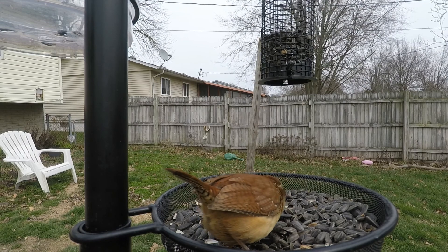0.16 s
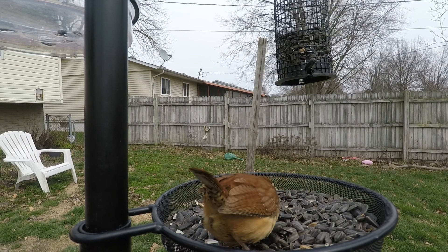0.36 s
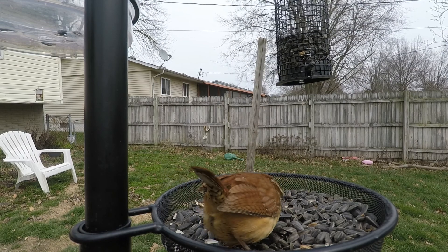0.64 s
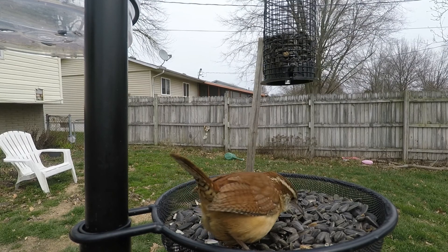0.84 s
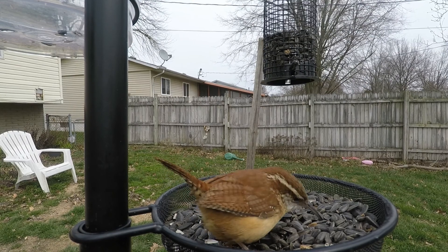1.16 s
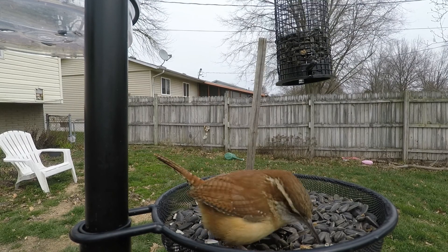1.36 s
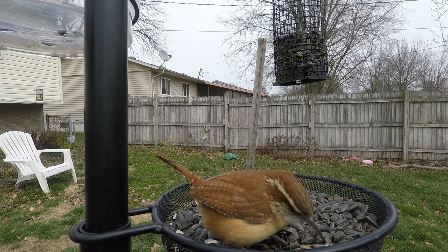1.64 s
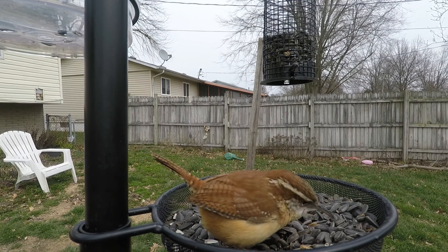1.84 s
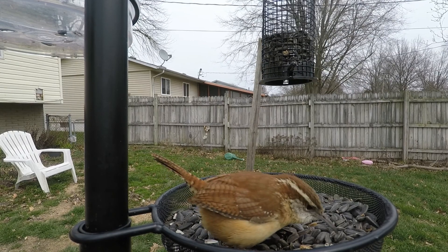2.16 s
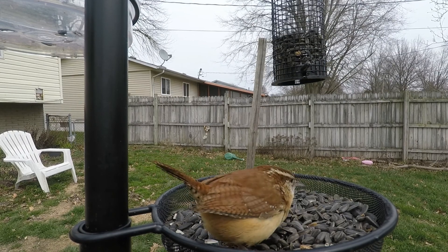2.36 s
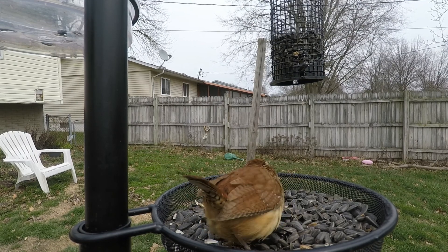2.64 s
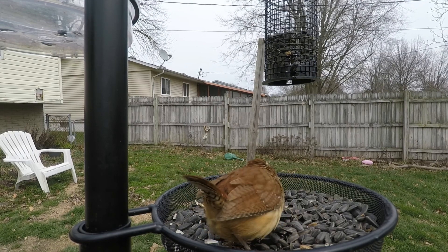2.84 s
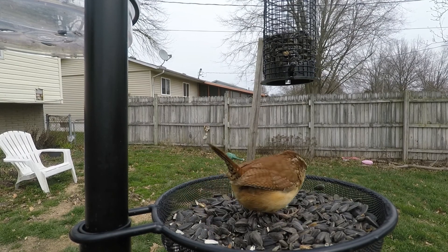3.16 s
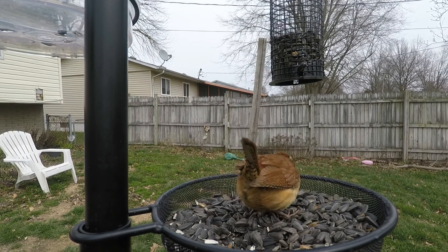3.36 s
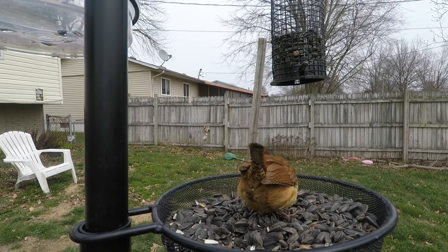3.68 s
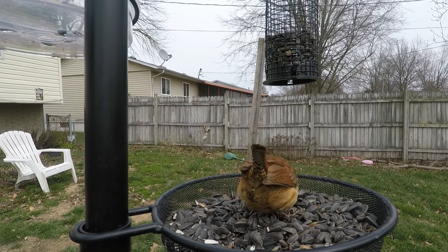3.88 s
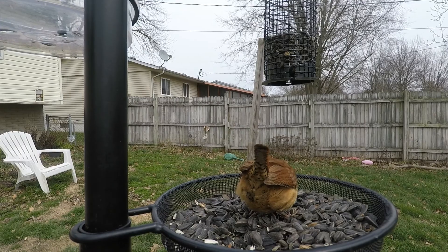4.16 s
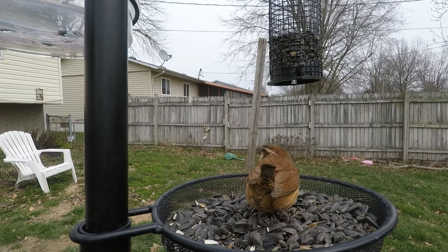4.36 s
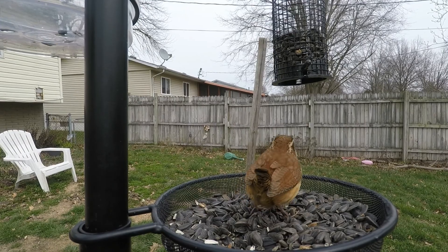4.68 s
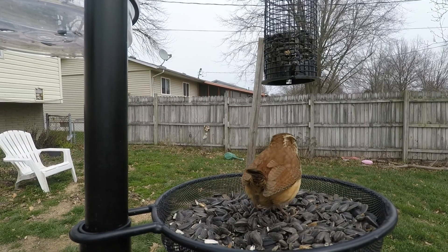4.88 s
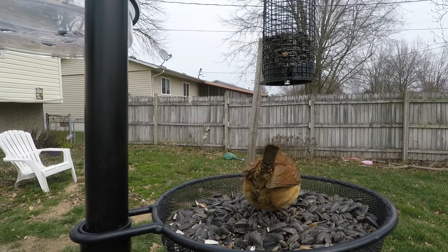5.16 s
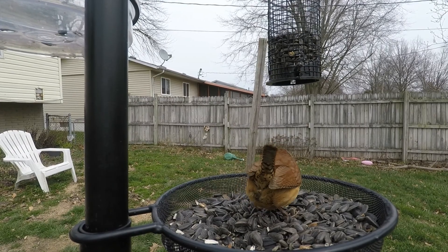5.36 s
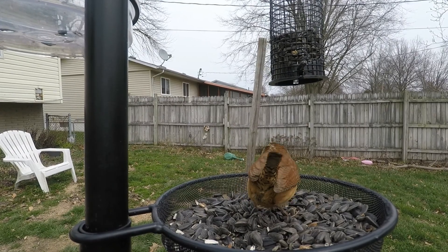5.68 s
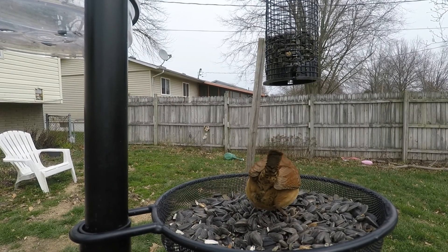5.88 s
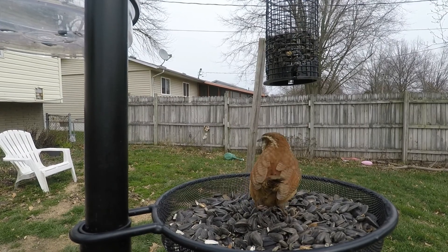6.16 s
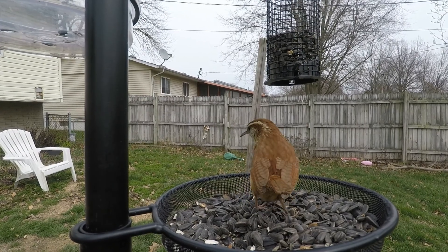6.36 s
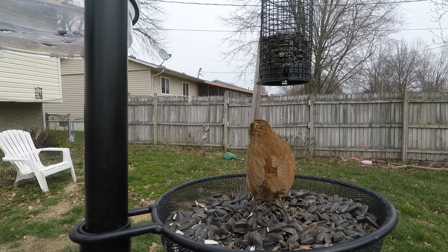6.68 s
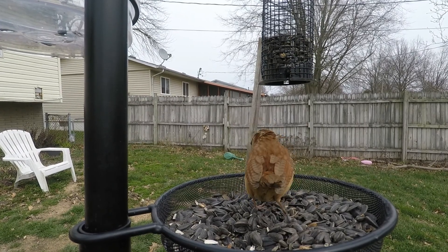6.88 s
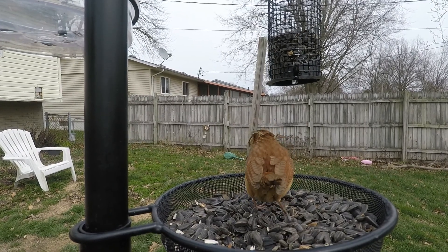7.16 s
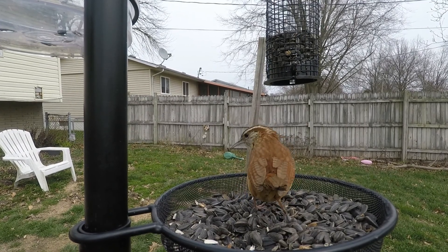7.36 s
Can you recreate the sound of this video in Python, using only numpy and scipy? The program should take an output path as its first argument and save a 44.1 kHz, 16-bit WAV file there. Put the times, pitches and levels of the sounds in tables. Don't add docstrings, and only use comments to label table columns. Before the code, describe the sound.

Outdoors in a yard, low wind buffets the microphone and far birds chirp and chatter with faint echoes. Around three seconds a crisp peck and hop sound on a metal tray of seeds; from four seconds come loud, boomy knocks, rattling seeds and small scrapes, in irregular clusters to the end, felt through the pole holding the microphone.

```python
import sys
import numpy as np
from scipy import signal
from scipy.fft import rfft, irfft, next_fast_len
from scipy.io import wavfile
from scipy.ndimage import uniform_filter1d, minimum_filter1d, map_coordinates

SR = 44100
rng = np.random.default_rng(int(sys.argv[2]) if len(sys.argv) > 2 else 0)


def voltage_ratio(decibels):
    exponent = np.asarray(decibels, float) / 20
    return 10 ** exponent


def materialize(psi):
    bounded = np.clip(np.atleast_2d(psi).T, -1, 1)
    quanta = np.round(bounded * 32767).astype(np.int16)
    wavfile.write(sys.argv[1], SR, quanta)


N = 332073


def evened(x):
    return x / np.sqrt(np.mean(x ** 2) + 1e-20)


def curve(rows, column=1):
    rows = np.array(rows)
    return np.interp(np.arange(N) / SR, rows[:, 0], rows[:, column])


def add(mix, s, sound):
    part = mix[..., round(s * SR):][..., :sound.shape[-1]]
    part += sound[..., :part.shape[-1]]


def resonate(x, hz, width, count=1):
    turn = np.exp(2j * np.pi * np.cumsum(hz * np.ones(len(x))) / SR)
    r = np.exp(-np.pi * width / SR)
    low = x / turn + 1e-18
    for _ in range(count):
        low = signal.lfilter([1 - r], [1, -r], low)
    return 2 * (turn * low).real


def drift(per_s):
    knots = rng.standard_normal(2000)
    return map_coordinates(knots, [np.arange(N) * per_s / SR], order=3)


def coloured(spectrum, share):
    hz = np.fft.rfftfreq(N, 1 / SR)
    f, db = np.transpose(spectrum)
    shape = voltage_ratio(np.interp(np.log(hz + 1), np.log(f + 1), db)) * share(hz)
    return irfft(rfft(rng.standard_normal(N)) * shape, N)


# t/s, level/dB
GUSTS = [(0.0, -32), (0.12, -15.5), (0.36, -25.5), (0.52, -19), (1.34, -20.5), (1.4, -27), (1.84, -24.5),
         (1.91, -30), (2.1, -17), (2.95, -23.5), (3.0, -18.5), (4.32, -32.5), (6.44, -32), (6.73, -19.5),
         (7.05, -38), (7.17, -20), (7.53, -33.5)]
# t/s, level/dB
HISS = [(0.0, -71.5), (0.38, -70), (3.98, -70), (4.1, -75), (4.32, -82.5), (4.745, -82), (4.755, -97),
        (4.79, -97), (4.8, -82), (5.64, -81.5), (6.1, -79.5), (6.75, -74), (6.9, -75.5), (7.09, -78),
        (7.53, -76.5)]
# f/Hz, level/dB per Hz
AIR_MID = [(8.8, -29), (15, 4), (33, -0.5), (55, -3.5), (87, -8.5), (174, -22.5), (293, -30.5), (552, -45),
           (1010, -47.5), (1240, -51), (1700, -54), (4950, -62), (7200, -59), (14800, -71)]
# f/Hz, level/dB per Hz
AIR_SIDE = [(8.8, -23), (15, 13), (60, 16), (138, -21), (174, -17.5), (239, -28.5), (369, -16),
            (638, -18.5), (1070, -24.5), (1170, -29), (1310, -29.5), (4670, -46), (7620, -39.5),
            (14800, -53)]


def air():
    def low(hz):
        return 1 / (1 + (hz / 130) ** 4)

    def high(hz):
        return np.sqrt(1 - low(hz) ** 2)

    wind = evened(coloured(AIR_MID, low))
    lumps = np.sqrt(abs(uniform_filter1d(wind ** 2, 5000)) + 0.016)
    wind *= voltage_ratio(curve(GUSTS) + .5) / lumps ** .7
    eddies = evened(coloured(AIR_SIDE, low)) * voltage_ratio(0.43 * curve(GUSTS) - 25.5)
    gain = voltage_ratio(curve(HISS) + 72 + 1.22 * drift(9.9))
    mid = evened(coloured(AIR_MID, high)) * voltage_ratio(-35) * gain
    side = evened(coloured(AIR_SIDE, high)) * voltage_ratio(-40.5) * gain
    wind_balance = voltage_ratio(np.array([[-1.6], [1.4]]))
    return wind * wind_balance + mid + (eddies + side) * np.array([[1], [-1]])


# t/s, level/dB
SWAY = [(0, -49), (.45, -21.5), (1.0, -31), (1.75, -38), (2.0, -26.5), (2.85, -34), (3.2, -23.5),
        (3.8, -31), (4.12, -15.5), (4.4, -11), (4.5, -19.5), (4.75, -11), (5.6, -19), (6.3, -12),
        (6.7, -18.5), (7.0, -12), (7.12, -23), (7.53, -17.5)]


def sway():
    turns = np.cumsum(56 + 3.62 * drift(14)) / SR
    bend = np.sqrt(2) * voltage_ratio(1.5 * drift(21)) * np.sin(2 * np.pi * turns)
    flutter = voltage_ratio(-11.0) * evened(resonate(rng.standard_normal(N), 69.6, 14, count=2))
    return voltage_ratio(curve(SWAY)) * (bend + flutter)


# f/Hz, left phase lead/rad, left-right level/dB
PORTS = [(56, 2.5, 0), (200, 2.7, -4.5), (330, 2.8, -2), (420, 1.8, 1), (510, 2.45, 0), (660, 2.85, 0),
         (900, 2.45, 2), (1300, 2.05, -1), (1480, 2.85, 0), (1900, 3.42, 1), (2350, 4.4, 2), (3300, 6.2, 0)]


def ports(x):
    size = next_fast_len(N + SR)
    x = np.pad(x, (0, size - N), "reflect", reflect_type="odd")
    x = x * np.r_[np.ones(N), np.hanning(2 * (size - N))[size - N:]]
    hz = np.fft.rfftfreq(size, 1 / SR)
    f, lead, db = np.transpose(PORTS)
    lead, db = (np.interp(np.log(hz + 1), np.log(f), v) for v in (lead, db))
    left, right = voltage_ratio(db / 2), voltage_ratio(-db / 2) * np.exp(-1j * lead)
    return irfft(rfft(x) * np.array([left, right]), size)[:, :N]


# its shape (t/s, f/Hz, level/dB); hoarseness 0-1; left-right level/dB;
# and its utterances (t/s, level/dB, pitch factor).
HOOK = ([(0, 3100, -14), (.011, 3550, -8), (.017, 4550, 0), (.026, 4650, 0), (.041, 4300, 0),
        (.057, 4050, 0), (.068, 3500, -6)], .2, 1.2, [(.839, -33.5, .985), (2.155, -34, 1.01),
        (3.07, -39, 1.01), (5.47, -50, 1.01), (6.642, -45, 1.01)])
LISP = ([(0, 6500, 0), (.045, 5700, 0)], .9, 3, [(.815, -52, 1), (2.13, -49, 1), (3.045, -52, 1),
        (6.62, -58, 1)])
FLICK = ([(0, 2950, -4), (.022, 3550, 0), (.034, 3300, -4)], .3, 3, [(2.345, -54, 1), (2.44, -52, .95),
         (.947, -43, .98), (.795, -47, 1), (.4, -51, 1), (2.266, -44, 1), (5.582, -54, 1), (6.75, -53, 1),
         (1.45, -61, .9), (2.75, -54, 1.13), (3.865, -56, .96), (5.412, -60, 1.18), (6.795, -57, 1.22),
         (1.96, -64, 1.2)])
SPARK = ([(0, 5600, -4), (.018, 5500, 0), (.028, 6100, 0), (.046, 7200, -6)], .6, 3, [(.378, -51, 1.5),
         (.928, -49, 1), (2.244, -46, 1), (5.56, -54, 1), (6.732, -56, 1)])
LEAD = ([(0, 4500, -8), (.018, 5150, 0), (.045, 5650, -3)], .3, -2, [(.682, -54, 1), (2.748, -53, 1),
        (4.605, -59, 1), (5.745, -66, 1), (.105, -62, .92)])
ARCH = ([(0, 2550, -24), (.025, 2880, -16), (.07, 3370, -1), (.087, 3520, 0), (.105, 3250, -3),
        (.135, 2750, -5)], .25, -2, [(.687, -39, 1), (2.76, -42, .965), (4.61, -50, 1), (5.74, -61, .92),
        (.733, -51, 1), (2.806, -50, .965), (2.86, -60, .95), (4.655, -63, .98), (5.79, -67, .92)])
SWEEP = ([(0, 1850, -8), (.045, 2250, -4), (.065, 3150, 0), (.085, 3650, -3)], .3, 1.5, [(1.78, -56, 1),
         (2.678, -53, 1), (2.955, -54, 1), (3.242, -56, 1), (3.535, -53, 1), (3.285, -63, .95),
         (3.59, -63, .95), (2.39, -56, .9), (2.095, -60, 1), (1.4, -66, .9), (3.01, -59, 1)])
PEAK = ([(0, 2500, -8), (.008, 3600, 0), (.018, 4550, 0), (.031, 3900, 0), (.041, 2900, 0),
        (.06, 2350, -4)], .35, 1.5, [(1.17, -63, 1), (1.268, -61, .89), (2.366, -48, 1.03), (2.41, -56, .9),
        (3.794, -49, 1), (6.37, -59, 1), (6.82, -50, 1), (4.205, -63, .92)])
FALL = ([(0, 5300, 0), (.015, 5050, 0), (.035, 5400, 0), (.095, 2900, -4)], .2, -1.5, [(2.64, -51, 1),
        (3.42, -65, 1.13)])
DROP = ([(0, 4600, 0), (.025, 3900, 0), (.042, 3000, -3)], .3, -1.5, [(.082, -57, .96)])
RIDGE = ([(0, 2950, -18), (.05, 3250, -12), (.061, 4700, 2), (.076, 4800, 2), (.083, 4050, -4),
         (.095, 3950, -4), (.105, 2950, -8), (.148, 2950, -12), (.168, 3700, -4)],
         .55, 1.5, [(.25, -45.5, 1), (4.058, -53, 1)])
CHIP = ([(0, 6000, 0), (.03, 6350, 0)], .3, -3, [(.14, -52, 1), (.172, -51, 1), (.265, -49, 1),
        (.31, -50, 1), (.385, -46, 1), (.43, -46, 1), (3.73, -48, .96), (4.07, -54, 1), (4.19, -50, 1),
        (4.235, -54, 1), (.305, -56, 1.55), (.39, -58, 1.5), (.13, -62, 1.39)])
DIP = ([(0, 6200, 0), (.025, 5700, -3), (.045, 6000, -3)], .2, -3, [(.35, -44, 1), (4.158, -50, 1),
       (.32, -50, .93)])
SEEP = ([(0, 6500, 0), (.08, 6750, 0), (.14, 6900, -5)], .2, -3, [(.17, -57, 1.02), (4.39, -62, 1)])
CLIMB = ([(0, 3500, 0), (.018, 4200, -3), (.034, 5500, 0)], .4, 1.5, [(3.768, -53, 1)])
CALLS = (HOOK, LISP, FLICK, SPARK, LEAD, ARCH, SWEEP, PEAK, FALL, DROP, RIDGE, CHIP, DIP, SEEP, CLIMB)


def birds():
    out = np.zeros((2, N))
    for shape, hoarse, pan_db, calls in CALLS:
        times, *columns = np.transpose(shape)
        t = np.arange(0, times[-1], 1 / SR)
        hz, swell_db = (uniform_filter1d(np.interp(t, times, c), size=200) for c in columns)
        balance_db = np.array([[pan_db], [-pan_db]]) / 2

        def chance(size):
            return evened(uniform_filter1d(rng.standard_normal(len(hz)), size=size))

        for s, db, key in calls:
            flutter = 1 - hoarse + hoarse * chance(50)
            fade, wobble = chance(350), chance(350)
            flutter *= voltage_ratio(2.8 * fade)
            pitch = key * hz * (1 + .006 * wobble)
            tone = np.sin(2 * np.pi * np.cumsum(pitch) / SR)
            tone *= flutter * signal.windows.tukey(len(hz), .3)
            both = np.array([tone, np.roll(tone, 2)])
            add(out, s, voltage_ratio(db + 7.0 + swell_db + balance_db) * both)
    return out


# delay t/s, level/dB
ECHOES = [
    (.05, -27),
    (.09, -25),
]


def yard(x):
    t = np.arange(SR // 2) / SR
    density, blur_s, t60_s = .05, .014, 0.45
    taps = rng.choice([-1., 1.], (2, len(t))) * (rng.random((2, len(t))) < density)
    walls = sum(voltage_ratio(db) * np.exp(-((t - s) / blur_s) ** 2) for s, db in ECHOES)
    walls = walls / np.sqrt(density * blur_s * SR)
    tail = taps * voltage_ratio(-60 * t / t60_s) * (1 - np.exp(-t / 0.006))
    response = voltage_ratio(-14) * tail / np.linalg.norm(tail[0]) + taps * walls
    return x + signal.fftconvolve(x, response, axes=1)[:, :N]


# t/s, level/dB, place struck (-1 near the pole to 1 at the rim)
KICKS = [(0.298, -28.5, 0.72), (0.417, -33, -1), (.65, -35.5, 0.25), (2.714, -29, 1), (3.138, -20.5, -0.89),
         (3.238, -26.5, -1), (3.346, -37, -1.2), (3.666, -33, 1), (3.969, -27.5, -0.24),
         (4.069, -11.5, 0.98), (4.197, -12.5, -0.02), (4.281, -16.5, 0.79), (4.716, -8.5, 0.92),
         (4.877, -26, 0.57), (4.938, -31, 0.28), (5.049, -29, 0.67), (5.123, -18, -0.76),
         (5.215, -16.5, 0.34), (5.437, -14.5, 0.54), (5.5, -23, -1.2), (5.554, -32, -1.1),
         (5.85, -21.5, -0.12), (5.924, -20, 1), (6.168, -18.5, 1), (6.214, -21, 0.78), (6.56, -22, -1.3),
         (6.646, -29, -0.84), (6.709, -24.5, -0.88), (6.854, -20, 0.15), (6.941, -18.5, 0.47),
         (7.007, -22.5, 0.12), (7.09, -26.5, .9), (7.173, -26, -1.6)]


def rattle():
    stir_db, rattle_db, rise_s, t60_s = -50.5, -19, 0.0065, 0.79
    out, t = np.full(N, voltage_ratio(stir_db)), np.arange(SR) / SR
    for s, db, place in KICKS:
        add(out, s, voltage_ratio(db + rattle_db - 60 * t / t60_s) * (1 - np.exp(-t / rise_s)))
    return out


# f/Hz, decay time t60/s
BRACKET = [(174, 0.29), (206, 0.32), (238, 0.36)]


def bracket():
    place_db = 6
    out, t = np.zeros(N), np.arange(SR // 2) / SR
    swell = 1 - np.exp(-t / 0.0018)
    for (s, db, place), luck in zip(KICKS, rng.random((len(KICKS), 6))):
        for k, (hz, t60) in enumerate(BRACKET):
            shifted_hz = hz * (.975 + 0.065 * luck[k])
            ring = np.sin(2 * np.pi * (shifted_hz * t + luck[k + 3]))
            mode_db = db - place_db * (k - 1 - place) ** 2 + 10.5
            add(out, s, voltage_ratio(mode_db - 60 * t / t60) * swell * ring)
    shaking = rattle() * voltage_ratio(13.0) * rng.standard_normal(N)
    stir = sum(resonate(shaking, hz, 25, count=2) for hz, t60 in BRACKET) * np.sqrt(SR / 100)
    return out * voltage_ratio(2.43 * drift(30)) + stir


# t/s, length/s, f/Hz, width/Hz, level/dB
CHATTER = [(0.3, 0.23, 6200, 1300, -47), (0.31, 0.16, 4600, 2400, -53), (.38, .14, 3200, 900, -56),
           (.3, .15, 12500, 3000, -65), (.305, .03, 9700, 900, -54), (2.33, 0.24, 3500, 1800, -53),
           (3.81, .14, 3700, 1500, -54), (4.116, 0.15, 6300, 1500, -52), (1.768, .19, 7100, 900, -64),
           (1.6, .25, 3000, 1600, -63), (2.85, .14, 3150, 600, -52), (5.8, .16, 3050, 600, -62),
           (1.87, .1, 3300, 600, -61), (1.47, .1, 3150, 300, -65), (6.4, 0.12, 3400, 400, -65),
           (6.64, .36, 4650, 700, -58), (3.165, .05, 5700, 1200, -53), (.38, .07, 9300, 1500, -60)]


def chatter():
    out = np.zeros((2, N))
    for s, length, hz, width, db in CHATTER:
        noise = rng.standard_normal((3, int(length * SR)))
        throb = voltage_ratio(2.5 * evened(uniform_filter1d(noise[2], size=500)))
        throb *= np.hanning(noise.shape[1]) ** .5
        rasp = evened(np.array([resonate(n, hz, width, count=2) for n in noise[:2]]))
        add(out, s, voltage_ratio(db) * throb * rasp)
    return out


# t/s, low-mode level/dB, middle-mode level/dB, high-mode level/dB
PECKS = [(3.049, -32, -35, -54), (5.229, -26.5, -26.5, -35.5), (5.453, -26.5, -27.5, -39),
         (5.842, -27, -30.5, -36), (6.709, -32, -35, -37), (7.51, -37.5, -39.5, -47),
         (3.164, -26, -28, -42), (3.189, -40, -18.5, -11), (3.211, -37, -20.5, -15), (3.229, -30, -40, -27),
         (4.063, -13.5, -16, -40), (4.076, -18, -12, -25), (4.124, -14.5, -13, -28.5),
         (4.141, -33, -27.5, -41), (4.173, -20, -37, -40), (4.282, -25.5, -29.5, -53),
         (4.385, -37, -30.5, -40), (4.666, -28.5, -42, -46), (4.736, -11, -22, -38),
         (4.875, -39.5, -29.5, -40), (4.934, -30, -34, -47), (4.962, -51, -63, -52),
         (5.116, -10.5, -11.5, -34.5), (5.131, -28.5, -43, -41), (5.192, -43.5, -28.5, -49),
         (5.21, -21.5, -6.5, -28), (5.292, -48, -47, -71), (5.432, -25.5, -27, -39),
         (5.467, -15, -18.5, -28.5), (5.535, -39, -36, -46), (5.575, -43.5, -38.5, -56),
         (5.712, -42, -50, -61), (5.823, -29, -40, -51), (5.852, -26.5, -26.5, -33.5),
         (6.171, -22, -26, -38), (6.284, -46, -53, -51), (6.32, -25.5, -29.5, -43.5),
         (6.604, -31.5, -35, -39.5), (6.698, -28.5, -33.5, -32), (6.795, -30.5, -33, -33),
         (6.83, -29.5, -33, -41), (7.002, -16.5, -37, -43), (7.047, -36, -43, -64), (7.197, -30, -38, -45),
         (7.242, -28.5, -33, -44), (7.333, -38, -34.5, -55)]
# t/s, low-mode level/dB
KNOCKS = [(2.991, -31), (3.035, -34), (3.126, -26), (3.148, -25.5), (3.236, -29), (4.196, -10.5),
          (4.243, -25.5), (4.258, -23.5), (4.298, -23), (4.313, -28), (4.357, -21), (4.709, -30),
          (5.049, -36.5), (5.403, -32), (5.917, -11), (5.959, -31.5), (6.021, -29), (6.099, -26.5),
          (6.138, -25.5), (6.213, -35.5), (6.417, -26), (6.53, -27.5), (6.565, -34.5), (6.815, -36),
          (6.91, -20.5), (6.926, -10.5), (6.945, -16), (7.037, -23.5), (7.13, -34), (7.16, -36),
          (7.29, -33), (7.371, -22.5), (7.419, -17.5), (7.453, -20.5), (7.5, -28.5)]
# t/s, level/dB
TICKS = [(3.0703, -35.5), (3.161, -47), (3.167, -41), (3.19, -31.5), (4.712, -54), (4.728, -47),
         (5.118, -54.5), (5.131, -61.5), (5.21, -47), (5.22, -49), (5.234, -57.5), (5.46, -50), (5.47, -36),
         (5.845, -45), (5.854, -39.5), (7.003, -47)]
# t/s, length/s, level/dB
SCRAPES = [(6.845, .098, -26.5), (5.7, 0.019, -41.5), (4.6, 0.018, -49), (3.8, .04, -49), (5.4, 0.065, -53),
           (7.2, .11, -54.5), (6, 0.069, -53.5), (7.8, .07, -44), (5.93, .12, -49), (6.03, .14, -49),
           (6.33, 0.21, -47.5), (18, 0.11, -52.5), (8.5, .16, -48.5), (5.14, .07, -47.5), (5.8, .05, -50),
           (5.2, 0.042, -49)]
# f/Hz, width/Hz, level/dB
TRAY = [
    [(420, 110, -9), (512, 110, -4.5), (652, 120, 0), (790, 150, -14)],
    [(905, 190, 1), (1080, 200, 0), (1270, 220, -4), (1546, 140, -1), (1780, 340, -5)],
    [(1950, 300, 1), (2140, 200, 2), (2370, 240, 1), (2770, 240, -4), (3090, 260, -5), (3600, 250, -13),
     (4200, 500, -12)],
    [(6260, 6900, 5.5), (7450, 3100, -11.5)],
    [(1130, 300, -12), (1330, 200, -6), (1548, 130, 0), (1900, 500, -16), (2380, 260, -14),
     (3020, 300, -20)],
]
# t/s, level/dB
THUDS = [(4.065, -11.5), (4.123, -26), (4.174, -31), (4.192, -13.5), (4.212, -14), (4.736, -28.5),
         (5.431, -26), (5.468, -21.5), (6.17, -28.5), (6.319, -30.5), (6.928, -27.5), (7.002, -17.5),
         (7.419, -30)]
# t/s, length/s, start f/Hz, end f/Hz, level/dB
SQUEAKS = [
    (6.126, 0.04, 1480, 1280, -44),
    (6.436, 0.034, 1060, 1210, -39),
    (6.436, 0.03, 2200, 2330, -48),
]


def tray():
    t = np.arange(1500) / SR
    force = np.zeros((5, N))
    knock_middle_db, knock_high_db = -17, -48.5
    knocks = [(s, db, db + knock_middle_db, db + knock_high_db) for s, db in KNOCKS]
    contact = [(0.0012, 0.0081), (0.00054, 0.0052), (0.0029, 0.0052)]  # rise/s, fall/s by group
    for s, *dbs in PECKS + knocks:
        for k, (rise, fall) in enumerate(contact):
            add(force[k], s - .0012, voltage_ratio(dbs[k] + 1.5) * (1 - np.exp(-t / rise)) * np.exp(-t / fall))
    for s, db in TICKS:
        add(force[3], s, voltage_ratio(db) * (1 - np.exp(-t / 0.00084)) * np.exp(-t / 0.0036))
    for s, length, db in SCRAPES:
        size = int(1.2 * length * SR)
        add(force[4], s, voltage_ratio(db + np.linspace(3, -6, size)) * signal.windows.tukey(size, .4))
    rattle_db = np.array([[-4], [-17], [-32]])
    force[:3] += rattle() * voltage_ratio(rattle_db + 3.7 * drift(45) + 2.1 * drift(160))
    force[4] *= voltage_ratio(3 * drift(130) - 1)
    force[0] += voltage_ratio(2.0) * force[4]

    grit = rng.standard_normal((5, N))
    impulse = 1. * (t == 0)
    out = np.zeros(N)
    for push, noise, modes in zip(force, grit, TRAY):
        ring = sum(voltage_ratio(db) * resonate(impulse, hz, width, count=3) for hz, width, db in modes)
        out += signal.oaconvolve(push * noise, ring / np.linalg.norm(ring))[:N]

    thud_hz, thud_t60_s = 434.5, 0.058
    ending = np.hanning(2 * len(t))[len(t):] ** .5
    for s, db in THUDS:
        fading = voltage_ratio(db + 6 - 60 * t / thud_t60_s) * (1 - np.exp(-t / 0.0013)) * ending
        add(out, s, fading * np.sin(2 * np.pi * thud_hz * rng.uniform(0.92, 1.04) * t))
    for s, length, from_hz, to_hz, db in SQUEAKS:
        hz = np.linspace(from_hz, to_hz, int(length * SR))
        swell = voltage_ratio(db + 8.5 + 3 * drift(250)[:len(hz)]) * np.hanning(len(hz))
        pitch = hz * (1 + .04 * drift(300)[:len(hz)])
        add(out, s, swell * np.sin(2 * np.pi * np.cumsum(pitch) / SR))
    return out


def scene():
    return ports(sway() + bracket() + tray()) + air() + yard(birds() + chatter())


def roll_off(x):
    return signal.sosfilt(signal.butter(12, 14950, fs=SR, output="sos"), x)


def record(dry):
    dulled = signal.sosfilt(signal.butter(3, 11800, fs=SR, output="sos"), dry)
    headroom = np.minimum(.93 / (abs(dulled).max(0) + 1e-9), 1)
    limiter = uniform_filter1d(minimum_filter1d(headroom, size=900), size=800)
    ending = np.sin(np.pi / 2 * np.minimum(np.arange(N)[::-1] / 130, 1)) ** 2
    return roll_off(dulled * limiter * ending)


dry = scene()
out = record(dry)
materialize(out)
```